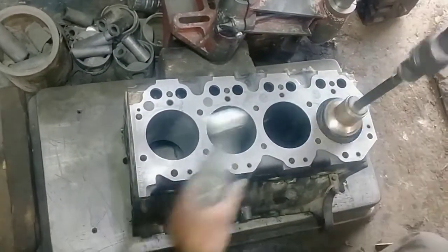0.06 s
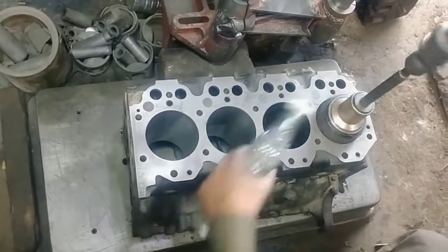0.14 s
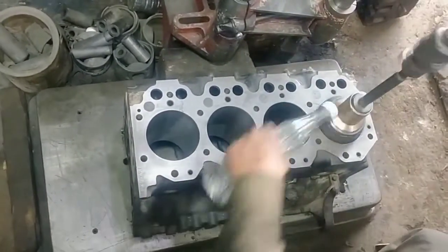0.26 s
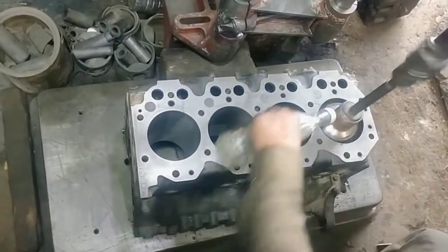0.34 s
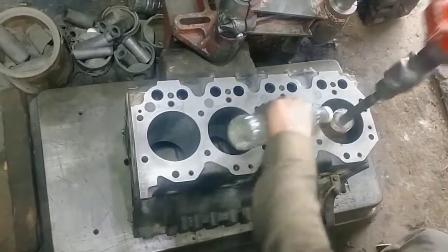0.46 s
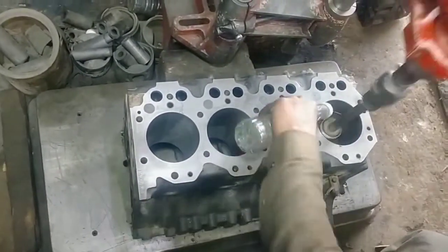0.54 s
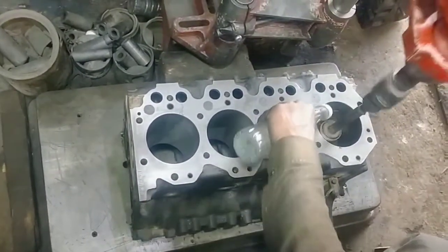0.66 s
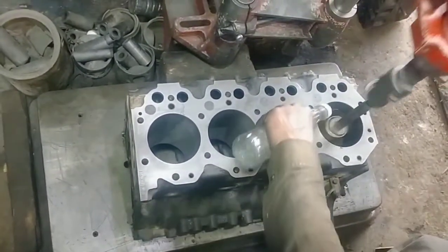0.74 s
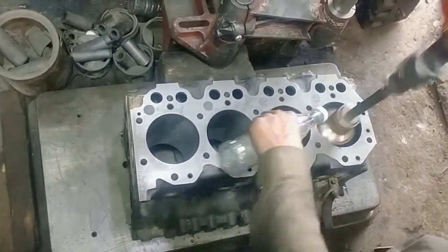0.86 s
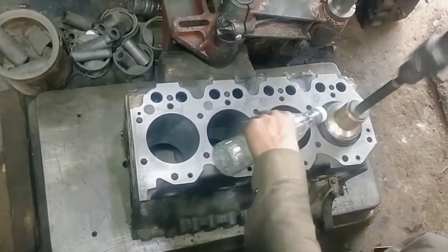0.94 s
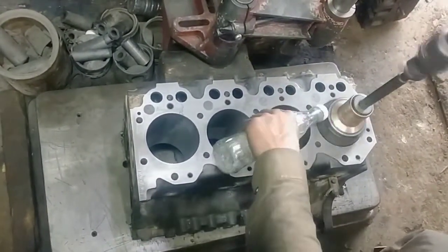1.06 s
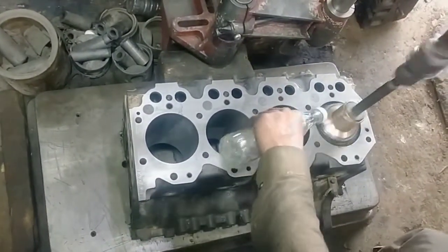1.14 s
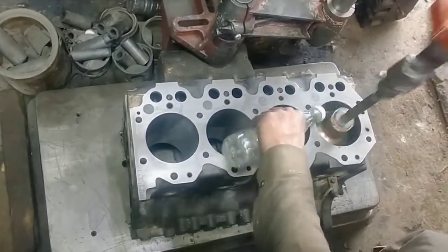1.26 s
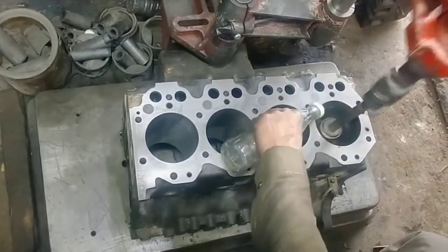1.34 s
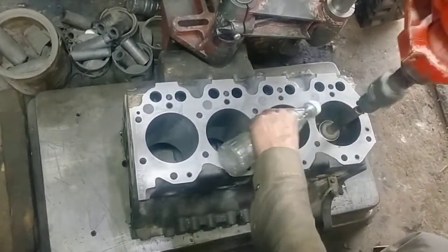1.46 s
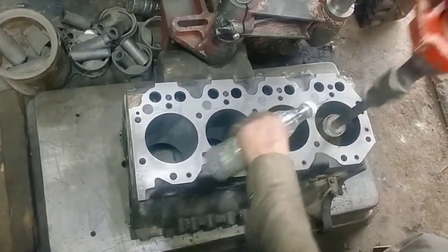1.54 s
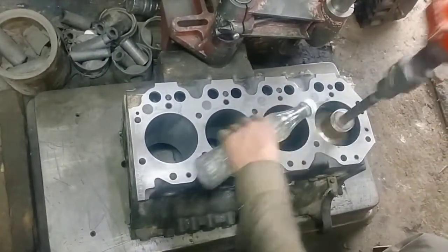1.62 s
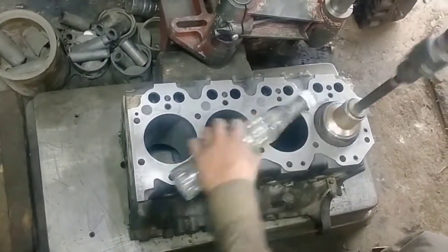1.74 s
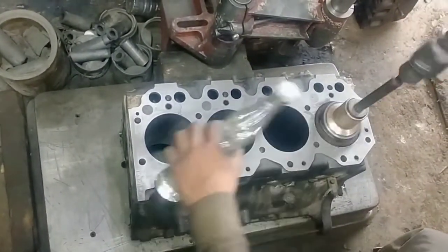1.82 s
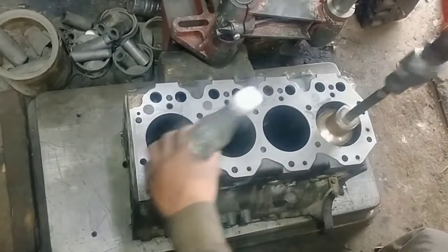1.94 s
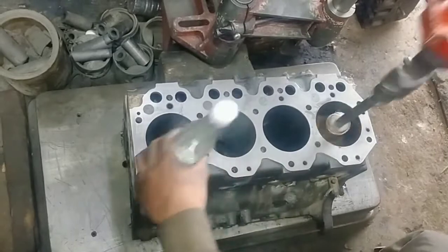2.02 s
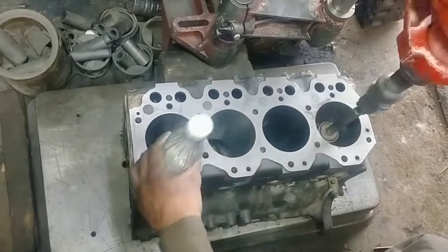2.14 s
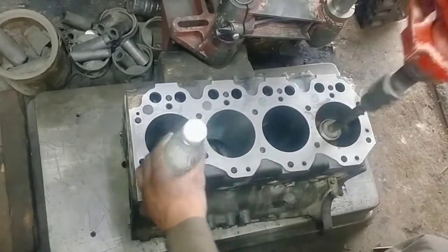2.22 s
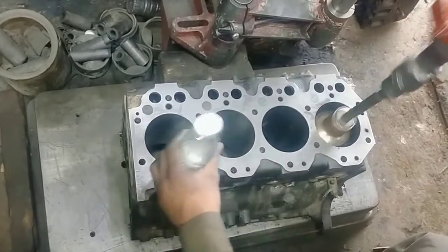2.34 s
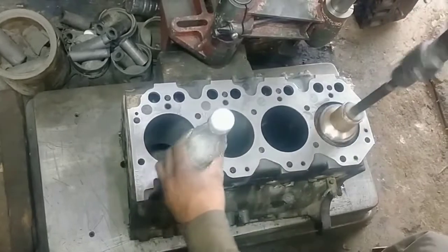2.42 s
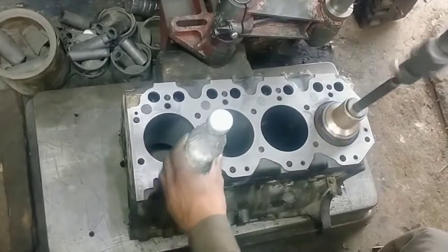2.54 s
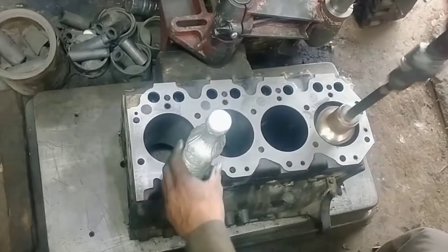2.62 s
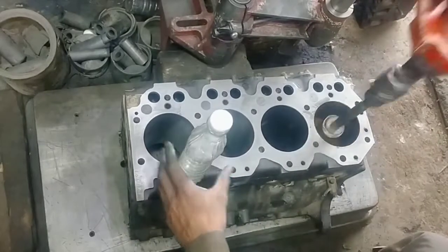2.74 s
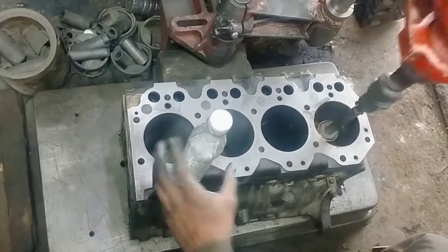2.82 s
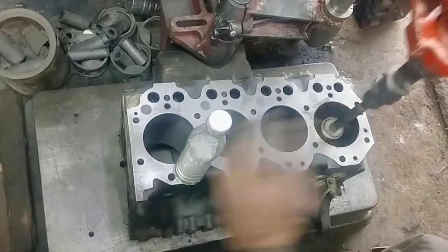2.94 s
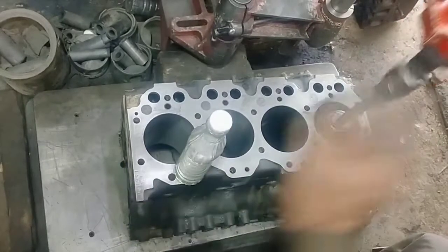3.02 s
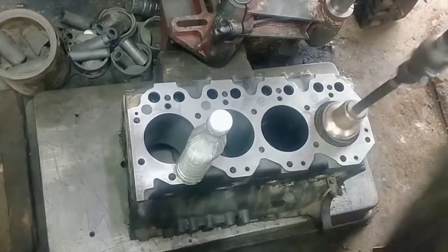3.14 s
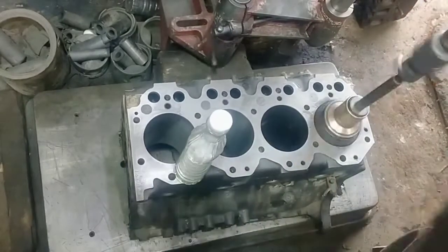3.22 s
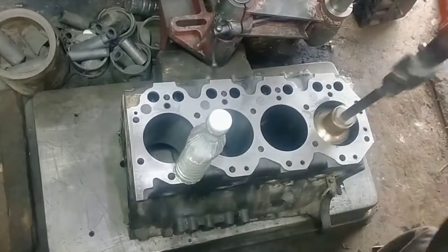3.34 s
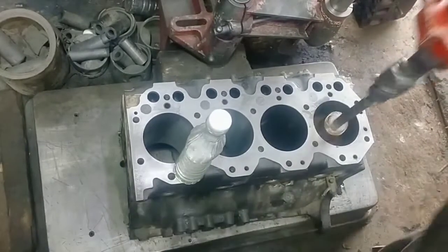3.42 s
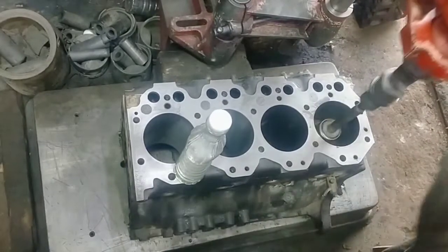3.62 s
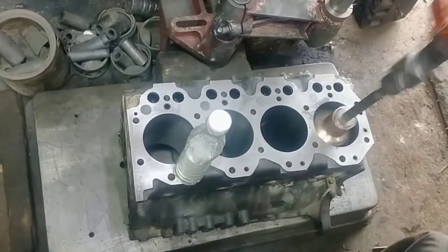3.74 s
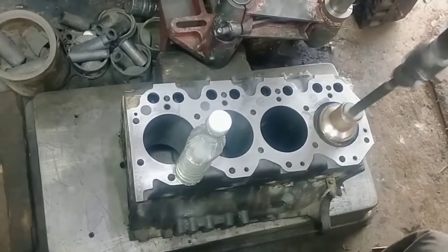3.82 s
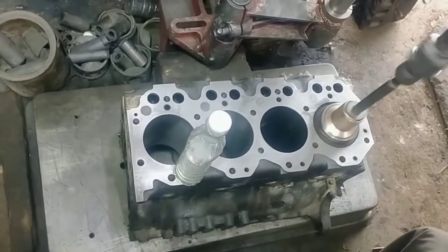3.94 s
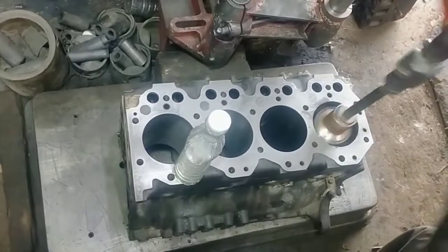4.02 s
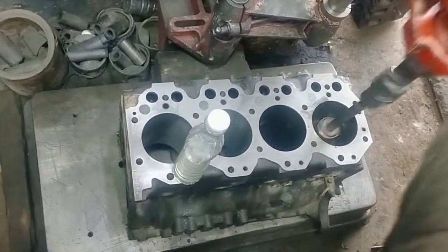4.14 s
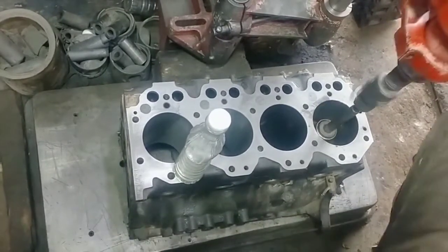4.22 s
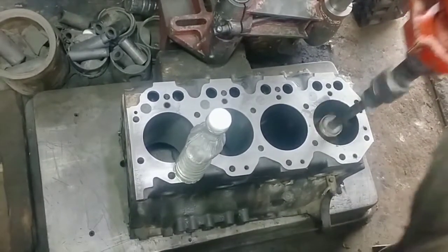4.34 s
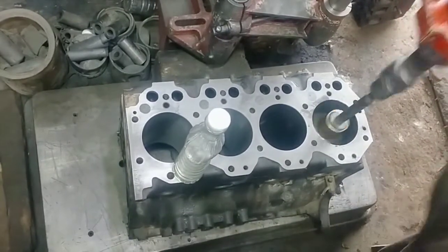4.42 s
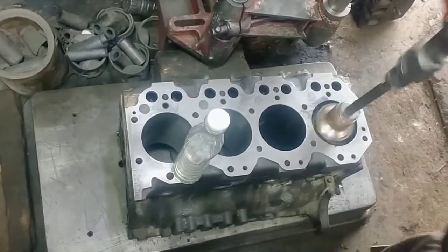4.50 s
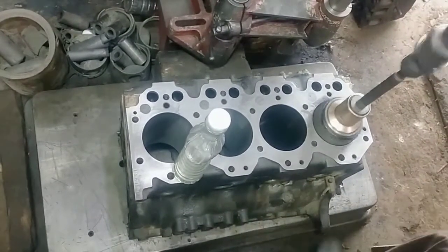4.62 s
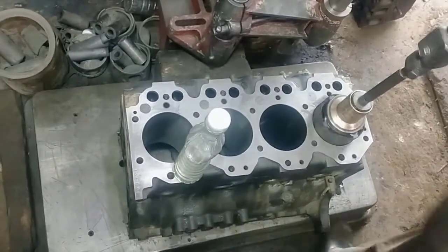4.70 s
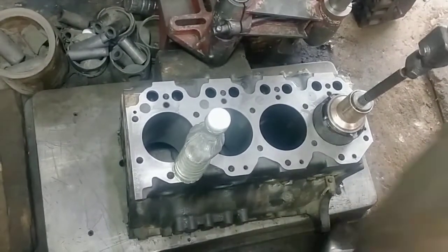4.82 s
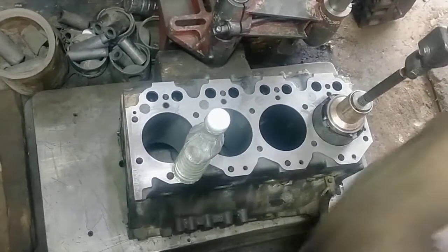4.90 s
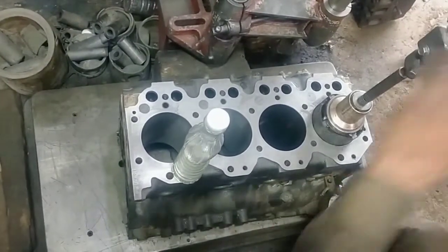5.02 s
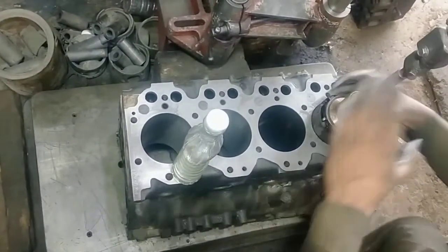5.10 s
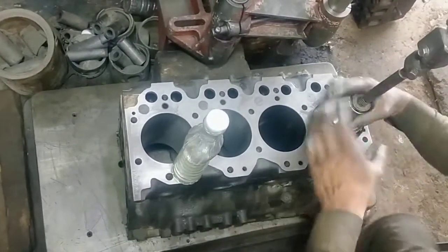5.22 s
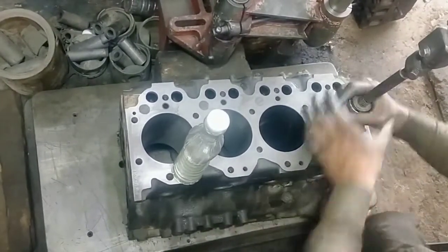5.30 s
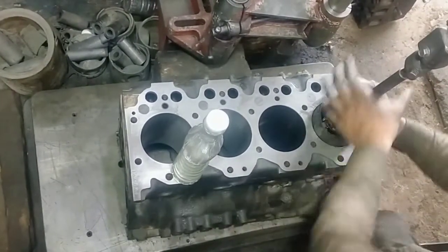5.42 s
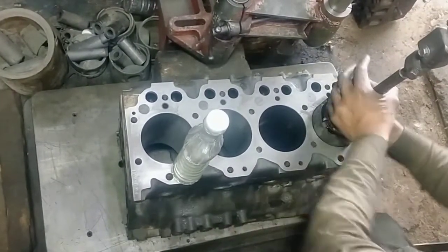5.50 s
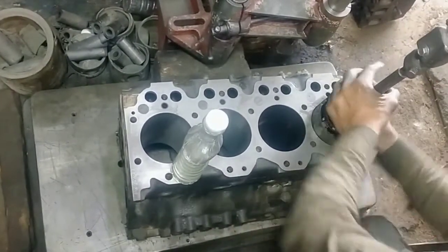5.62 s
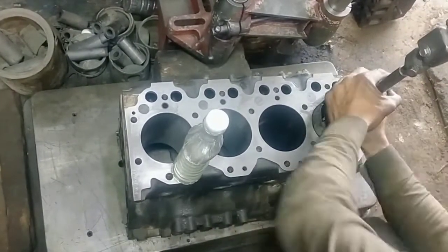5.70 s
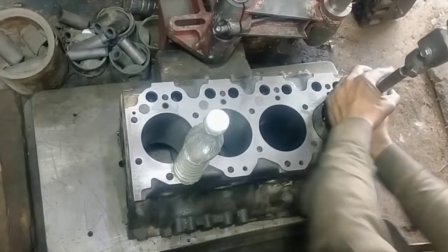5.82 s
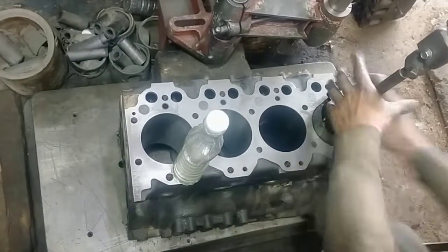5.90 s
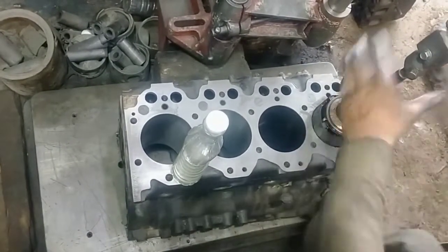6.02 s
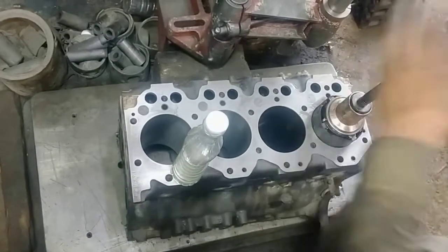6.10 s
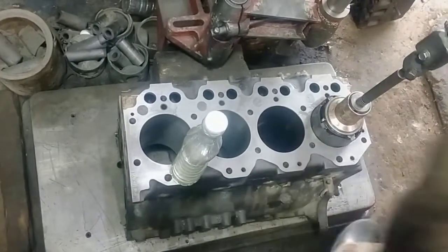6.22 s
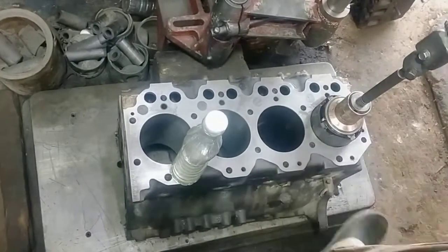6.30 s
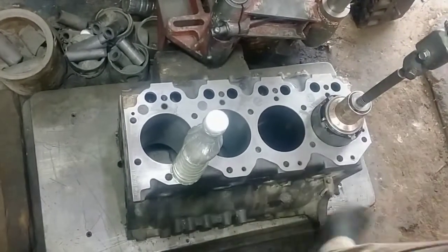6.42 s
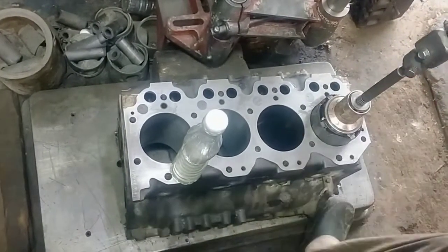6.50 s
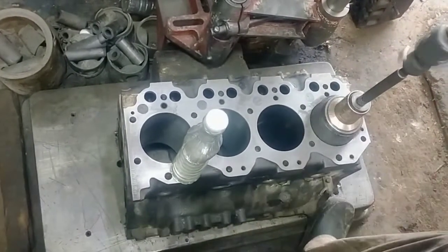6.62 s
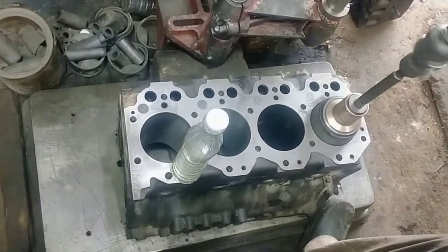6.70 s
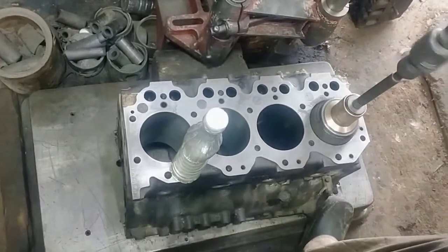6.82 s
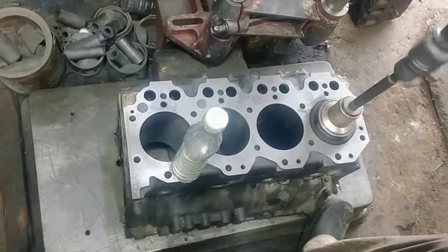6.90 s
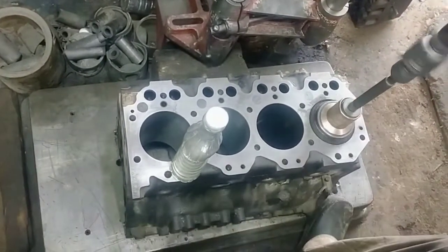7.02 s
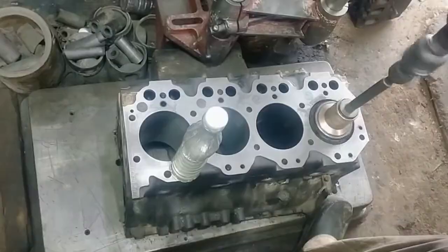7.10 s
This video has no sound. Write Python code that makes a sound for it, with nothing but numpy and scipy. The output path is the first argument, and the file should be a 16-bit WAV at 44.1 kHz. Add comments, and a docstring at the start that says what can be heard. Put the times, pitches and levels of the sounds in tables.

```python
"""Honing a cylinder bore beside a generator

A drill spins a hone up and down a bore: grit hisses, resonances squeal, and shaped noise and ringing modes
make the knocks of the head. A four-cylinder diesel generator drones as a sum of sines with throbbing noise.
Small steel parts clink as decaying sines; the drill stops, and dry metal scrapes and jingles in the quiet.
At last the motor is switched on again, growls as a rough harmonic tone and drags the generator down."""
import sys
import numpy as np
from scipy import signal
from scipy.fft import rfft, irfft, next_fast_len
from scipy.io import wavfile

SR = 44100
rng = np.random.default_rng(int(sys.argv[2]) if len(sys.argv) > 2 else 0)


def inscribe(sig):
    """Save sig as 16-bit PCM at rate SR to the path in sys.argv[1].

    A 1-D sig is mono; a 2-D sig holds one channel per row.
    Samples are clipped to [-1, 1] before scaling.
    """
    pcm = np.round(np.clip(np.atleast_2d(sig).T, -1, 1) * 32767)
    wavfile.write(sys.argv[1], SR, pcm.astype(np.int16))


def rack_gain(trim_db):
    """Turn a fader trim in dB into the linear factor to multiply a signal by."""
    fader = np.asarray(trim_db, float)
    return 10 ** (fader / 20)


N = 315315
TIME_S = np.arange(N) / SR

# Generator speed, sagging under electric load. Each row: time in seconds, firings per second.
SPEED = [(0, 48.5), (4.55, 48.54), (5.0, 48.85), (5.4, 49.17), (6.47, 49.17), (6.61, 48.75), (7.0, 46.95),
         (7.15, 46.9)]
# Exhaust note. Each row: multiple of the four-stroke cycle, relative level in dB.
EXHAUST_ORDERS = [(3, -39.5), (4, -5), (5, -23.5), (6, -13), (7, -10.5), (8, -9), (9, -18), (10, -14.5),
                  (11, -19), (12, 1), (13, -25.5), (14, -13.5), (15, -9), (16, -12.5), (17, -16.5),
                  (18, -14.5), (19, -13), (20, -21), (21, -23.5), (22, -23), (23, -26), (24, -16.5),
                  (25, -25.5), (26, -27.5), (27, -22.5), (28, -28), (29, -25.5), (30, -29.5), (31, -19),
                  (32, -27.5), (33, -23.5), (34, -21.5), (35, -25), (36, -37), (37, -52), (38, -31),
                  (39, -35), (40, -25)]
# Orders that depend on load. Each row: multiple, change in dB running free, change in dB dragged down.
LOAD_SHIFT = [(6, -1, -2), (8, -6.5, 3.5), (10, 5.5, -1.5), (12, 0, -3.5), (14, 4, -6), (15, -10.5, -4.5)]
EXHAUST_DB = -27
# These two spreads are scaled for each order.
EXHAUST_WOBBLE_DB, EXHAUST_WANDER_RAD = 1.4, 0.3
# The sixth order is swollen at first and settles.
SWELL_DB, SWELL_PEAK_S, SWELL_WIDTH_S = 10.5, 0.25, 0.27
# Engine rumble and fan. Each row: frequency in Hz, relative level in dB per Hz.
ROAR_SPECTRUM = [(40, -44), (48, 1), (100, -10), (170, -4.5), (240, -5.5), (300, 0), (330, -21), (420, -5),
                 (460, -16), (700, -12.5), (900, -16), (1200, -33.5)]
ROAR_DB, ROAR_THROB = -33.5, 0.2
# Valve gear and casing. Each row: frequency in Hz, relative level in dB per Hz.
CLATTER_SPECTRUM = [(800, 9.5), (1000, -2.5), (1500, 0.5), (1900, -12.5), (2150, -20), (2500, -25.5),
                    (2850, -18), (3450, -30.5), (3700, -28), (5200, -33), (8400, -37.5), (9700, -34.5),
                    (10500, -25.5), (11400, -36.5), (13200, -42.5), (15600, -36.5)]
CLATTER_DB = -49.5

DRILL_STOP_S, RUN_DOWN_S, DRILL_START_S, SPIN_UP_S = 4.63, 0.1, 6.52, 0.07
# Grinding of block and bore. Each row: frequency in Hz, relative level in dB per Hz.
GRIND_SPECTRUM = [(250, -17.5), (420, -9), (520, 1), (750, 0), (1150, -6), (1400, -11), (1650, -13),
                  (1800, -16.5), (2150, -16), (2300, -13), (2750, -14), (2950, -20), (3450, -27),
                  (3700, -38.5), (4600, -47)]
GRIND_DB, GRIND_STOPPED_DB = -35.5, -40.5      # a duller wash stays while the drill stands
# Hiss of the stones. Each row: frequency in Hz, relative level in dB per Hz.
HISS_SPECTRUM = [(3300, -15), (3800, -15), (4750, -14), (5000, -33.5), (6300, -19.5), (8300, -18),
                 (9700, -8), (10100, -2.5), (10700, 5), (11300, 2), (11800, -1), (13500, -5.5),
                 (15600, -6.5)]
HISS_DB, HISS_STOPPED_DB = -58.5, -71.5
WAVER_DB = 0.5      # slow spread of grind and hiss
# Bore and block resonances. Each row: frequency in Hz, width in Hz, level in dB.
BLOCK_MODES = [(417.3, 11, -48), (563, 14, -52), (716, 14, -48), (1138, 2.8, -55.5), (1400, 25, -60.5),
               (2985, 40, -66.5), (3454, 28, -69.5), (4680, 60, -83), (6700, 120, -83.5), (7070, 40, -84.5)]
# Squealing bore modes. Each row: frequency in Hz, width in Hz, relative level in dB.
SQUEAL_MODES = [(2347, 30, -5.5), (2506, 62, -3.5), (2555, 35, -9), (2780, 21, -9)]
SQUEAL_DB, SQUEAL_STOPPED_DB, SQUEAL_WAVER_DB = -53.5, -66, 3
# Stones biting, mostly just after a stroke turns. Each row: peak time in seconds, squeal level in dB.
BITES = [(0.57, -38), (0.63, -46), (1.39, -42), (1.949, -47), (2.13, -44), (2.84, -44), (3.5, -40),
         (3.56, -42.5), (4.21, -48), (4.94, -46), (6.55, -45)]
BITE_RISE_S, BITE_T60_S = 0.014, 0.23

# Knocks of the hone head. Each row: start in seconds, strength in dB, treble chatter against it in dB,
# thud against it in dB.
KNOCKS = [(0.5648, -18.5, -21, 5), (0.597, -31, -28, -5), (0.624, -34, -17, -11), (0.872, -32, -30, 14),
          (1.39, -22.5, -21, 6), (1.5494, -40, -11, -4), (2.1193, -22, -21, 4), (2.139, -30, -20, 6),
          (2.208, -32, -27, 7), (2.6978, -37, -12, -3), (2.8176, -21, -21, 4), (3.5038, -21.5, -25, 11),
          (3.561, -28, -18, 8), (3.923, -36, -14, 2), (4.213, -35, -13, 8), (4.357, -37.5, -14, 6),
          (4.8825, -31.5, -28, 22.5), (4.9017, -29, -18, 14.5), (4.919, -27.5, -31, 12.5),
          (5.145, -32, -33, 6), (5.365, -42, -29, -1), (6.5317, -34, -19, 10), (6.552, -20, -21, 5),
          (6.569, -26, -19, 9)]
# Hone head against the bore. Each row: frequency in Hz, relative level in dB, 60 dB decay time in seconds.
HEAD_MODES = [(432, -3, 0.1), (734, 4.5, 0.019), (1530, -10.5, 0.014), (987, -0.5, 0.085),
              (1078, -5, 0.091), (1160, -16, 0.13), (1910, -18, 0.03), (2470, -13.5, 0.089),
              (2680, -17, 0.027), (2670, -16, 0.13), (2940, -25, 0.025), (4390, -28.5, 0.054),
              (5930, -30, 0.029), (6700, -27.5, 0.1)]
# Rattle after the blow. Each row: frequency in Hz, relative level in dB per Hz.
RATTLE_SPECTRUM = [(500, -10), (750, 0), (1200, 1), (1900, -7), (2300, -11), (2900, -1), (3500, -11.5),
                   (3900, -25), (6000, -44), (8000, -36.5)]
# Thud of the blow. Each row: frequency in Hz, relative level in dB per Hz.
THUD_SPECTRUM = [(110, -24), (175, 5.5), (300, -5.5), (600, -2.5), (950, -8.5), (1500, -16.5), (2000, -42)]
RATTLE_T60_S, CHATTER_T60_S, THUD_T60_S = 0.18, 0.15, 0.29
USUAL_CHATTER_DB = -20      # blows brighter than this wake the top modes
CONTACT_CUT = 2.5           # low-pass of the contact, as a multiple of the mode

# Three small steel parts, each struck once: the list holds the strike times in seconds.
CLINK_S = [3.1545, 4.912, 6.355]
# Modes of the struck parts. Each row is one part: its mode frequencies in Hz.
CLINK_HZ = [
    [4743, 9501, 9685, 15030],
    [2783, 2875, 4414, 3273],
    [6150, 9550, 12650, 14200],
]
# Ringing of those modes. Each row is one part: pairs of level in dB, 60 dB decay time in seconds.
CLINK_RINGS = [
    [(-70, .15), (-43.5, 0.32), (-52, 0.1), (-48, 0.21)],
    [(-41.5, .2), (-46, .12), (-61, 0.23), (-62, .1)],
    [(-68, .06), (-52, .07), (-52, .07), (-62, .05)],
]

# Dry metal sliding. Each row: peak time in seconds, level in dB, rise in seconds, 60 dB decay in seconds.
SCRAPES = [(6.206, -75, .02, .3), (6.287, -49.5, 0.026, 0.38), (6.4, -61, .06, .28)]
# Sliding noise. Each row: frequency in Hz, relative level in dB per Hz.
SLIDE_SPECTRUM = [(3500, -40), (5400, -17), (6200, -13), (7000, -20), (8500, -17), (9800, -12), (11100, 1),
                  (13000, -10), (15600, -16)]
# Loose parts jingling. Each row: frequency in Hz, width in Hz, level in dB against the sliding noise.
SLIDE_TINKS = [(6200, 150, -20), (9600, 100, -18), (10700, 100, -11), (11500, 90, -9), (12200, 90, -16),
               (13500, 90, -14), (15000, 150, -15)]

# Motor growl. Each row: multiple of the growl frequency, relative level in dB.
GROWL_PARTIALS = [(1, 2), (2, -4.5), (3, -11), (4, -19), (5, -32), (7, -38), (8, -43), (11, -46)]
# Gearbox resonances. Each row: frequency in Hz, width in Hz, level in dB against the growl.
GEAR_WHINE = [(1630, 50, -19.5), (2290, 40, -26), (3000, 40, -32), (3880, 60, -46), (4790, 50, -51),
              (5500, 300, -46), (6650, 200, -41), (8500, 300, -47), (9350, 150, -44)]
GROWL_START_S, GROWL_FADE_S = 6.56, 0.047
GROWL_DB, GROWL_GAIN_DB, GROWL_BUILD_S = -36, 3.5, 0.21      # it builds as the load comes on
GROWL_HZ, GROWL_SAG_HZ_PER_S = 355, 21


def rms_one(x):
    """Normalisation: a signal divided by its root mean square has rms 1."""
    return x / np.sqrt(np.mean(x ** 2) + 1e-20)


def drift(rate_hz):
    """Slow fluctuation: white noise through two equal poles wanders smoothly, here with spread 1."""
    pole = np.exp(-200 * np.pi * rate_hz / SR)      # one step per 100 samples
    white = rng.standard_normal(N // 100 + 1002)
    slow = signal.lfilter([1], [1, -2 * pole, pole * pole], white)[1000:]      # skip the settling
    slow = rms_one(slow - slow.mean())
    return np.interp(np.arange(N) / 100, np.arange(len(slow)), slow)


def colour(x, spectrum):
    """Spectral shaping: a gain for each frequency colours a steady noise, here brought to rms 1."""
    size = next_fast_len(N)
    hz, level_db = np.transpose(spectrum)
    axis_hz = np.maximum(np.arange(size // 2 + 1) * SR / size, 1)
    gain = rack_gain(np.interp(np.log(axis_hz), np.log(hz), level_db, left=-90, right=-90))
    return rms_one(irfft(rfft(x, size) * gain, size)[:N])


def grit(per_s, spread_db, smooth):
    """Shot noise: random clicks of uneven size over a share of smooth noise."""
    sizes = rack_gain(spread_db * np.minimum(rng.exponential(1, N), 4))
    signed = sizes * rng.choice([-1, 1], N)
    struck = rng.random(N) < per_s / SR
    return rms_one(signed * struck) + smooth * rng.standard_normal(N)


def resonance(x, hz, width_hz):
    """Resonance: a pair of poles passes a narrow band, with gain 1 on top."""
    r = np.exp(-np.pi * width_hz / SR)
    poles = [1, -2 * r * np.cos(2 * np.pi * hz / SR), r * r]
    return signal.lfilter([(1 - r * r) / 2, 0, (r * r - 1) / 2], poles, x)


def ramp(start_s, length_s):
    """Linear transition: climbs from 0 to 1 and stays there."""
    return np.clip((TIME_S - start_s) / length_s, 0, 1)


def swell(peak_s, peak_db, rise_s, t60_s):
    """Build-up and decay: an envelope rises to a peak and dies away exponentially."""
    late = np.maximum(TIME_S - peak_s, 0)
    return ramp(peak_s - rise_s, rise_s) ** 2 * rack_gain(peak_db - 60 * late / t60_s)


def firing_rate():
    """Engine speed: firings per second, interpolated between the points of the table."""
    return np.interp(TIME_S, *np.transpose(SPEED))


def engine_cycle():
    """Four-stroke phase: four firings, and four periods of the supply, make one turn of the cycle."""
    return 2 * np.pi * np.cumsum(firing_rate() / 4) / SR


def order_shifts_db():
    """Load dependence: some orders change level as the speed rises above or sags below its first value."""
    firing_hz = firing_rate()
    usual_hz = SPEED[0][1]
    free = np.maximum(firing_hz - usual_hz, 0) / (firing_hz.max() - usual_hz)
    dragged = np.maximum(usual_hz - firing_hz, 0) / (usual_hz - firing_hz.min())
    shift_db = {order: free_db * free + dragged_db * dragged
                for order, free_db, dragged_db in LOAD_SHIFT}
    shift_db[6] = shift_db[6] + SWELL_DB * np.exp(-((TIME_S - SWELL_PEAK_S) / SWELL_WIDTH_S) ** 2)
    return shift_db


def exhaust_note(cycle):
    """Harmonic series: exhaust orders are multiples of the cycle, wavering a little in level and phase."""
    shift_db = order_shifts_db()
    note = np.zeros(N)
    for order, level_db in EXHAUST_ORDERS:
        # firing orders are steady, the ones between come from uneven cylinders
        firing = order % 4 == 0
        loose = (0.15 if firing else 1) * np.sqrt(order / 12)
        wobble_db = EXHAUST_WOBBLE_DB * loose * drift(3.3)
        phase = rng.uniform(0, 2 * np.pi) + EXHAUST_WANDER_RAD * loose * drift(0.97)
        order_db = EXHAUST_DB + level_db + shift_db.get(order, 0) + wobble_db
        note += np.sqrt(2) * rack_gain(order_db) * np.sin(order * cycle + phase)
    return note


def generator():
    """Amplitude modulation: rumble and clatter throb with each firing beneath the exhaust note."""
    cycle = engine_cycle()
    note = exhaust_note(cycle)
    throb = 1 + ROAR_THROB * np.cos(4 * cycle) + 0.15 * np.cos(2 * cycle) + 0.1 * np.cos(cycle)
    roar = rack_gain(ROAR_DB + 0.36 * drift(4)) * colour(rng.standard_normal(N) * throb, ROAR_SPECTRUM)
    clatter = rack_gain(CLATTER_DB + 0.51 * drift(8.3)) * colour(grit(8000, 1.6, 1.4) * throb, CLATTER_SPECTRUM)
    return note + roar + clatter


def drilling():
    """Drive state: 1 while the drill turns, 0 while it stands."""
    return 1 - ramp(DRILL_STOP_S, RUN_DOWN_S) + ramp(DRILL_START_S, SPIN_UP_S)


def squeal(on):
    """Frictional excitation: biting stones set narrow bore modes squealing."""
    envelope = rack_gain(np.interp(on, [0, 1], [SQUEAL_STOPPED_DB, SQUEAL_DB]) + SQUEAL_WAVER_DB * drift(5.2))
    for peak_s, peak_db in BITES:
        envelope += swell(peak_s, peak_db, BITE_RISE_S, BITE_T60_S)
    out = np.zeros(N)
    for hz, width_hz, level_db in SQUEAL_MODES:
        mode = rms_one(resonance(grit(1500, 4.1, 0.71), hz, width_hz))
        out += envelope * rack_gain(level_db + 2.2 * drift(12)) * mode
    return out


def hone():
    """Abrasive friction: stones drag grit over the bore; block and bore ring along in narrow resonances."""
    on = drilling()
    grind_db = np.interp(on, [0, 1], [GRIND_STOPPED_DB, GRIND_DB]) + WAVER_DB * drift(1.7)
    hiss_db = np.interp(on, [0, 1], [HISS_STOPPED_DB, HISS_DB]) + WAVER_DB * drift(0.91)
    chatter_db = drift(8.3)      # shared by grind and hiss
    out = rack_gain(grind_db + chatter_db) * colour(grit(6000, 2.23, 1.05), GRIND_SPECTRUM)
    for hz, width_hz, level_db in BLOCK_MODES:
        mode = rms_one(resonance(rng.standard_normal(N), hz, width_hz))
        out += rack_gain(grind_db - grind_db.mean() + level_db) * mode
    torque = 1 + 0.12 * np.cos(4 * engine_cycle())      # the drill's pull pulses with the supply
    hiss_level = torque * rack_gain(hiss_db + 0.8 * chatter_db + 1.2 * drift(30))
    hiss = hiss_level * colour(grit(12000, 2.8, 1.5), HISS_SPECTRUM)
    return out + squeal(on) + hiss


def head_ring():
    """Modal excitation: each blow, softened by oily contact, rings the head's modes as decaying sines."""
    at = [round(row[0] * SR) for row in KNOCKS]
    knocks_db = np.array(KNOCKS)
    extra_db = knocks_db[:, 2] - USUAL_CHATTER_DB
    strengths_db = knocks_db[:, 1:2] - 7 + rng.normal(0, 2, (len(at), len(HEAD_MODES)))
    rung = np.zeros(N)
    for (hz, level_db, t60_s), hit_db in zip(HEAD_MODES, strengths_db.T):
        clicks = np.full(N, 1e-18)
        clicks[at] = rack_gain(hit_db + level_db + (hz > 4000) * extra_db)
        # the oily contact is no sharper than the mode needs
        soft = np.exp(-2 * np.pi * CONTACT_CUT * hz / SR)
        clicks = signal.lfilter([(1 - soft) ** 2], [1, -2 * soft, soft * soft], clicks)
        r = rack_gain(-60 / (t60_s * SR))
        w = 2 * np.pi * hz / SR
        rung += signal.lfilter([0, np.sin(w)], [1, -2 * r * np.cos(w), r * r], clicks)
    return signal.sosfilt(signal.butter(2, 6500, fs=SR, output="sos"), rung)


def knocks():
    """Impact: a slightly dull blow leaves a dying rattle; treble chatter follows and the thud lasts longer."""
    body, bright, thud = np.zeros((3, N))
    for start_s, strength_db, bright_db, thud_db in KNOCKS:
        age = np.maximum(TIME_S - start_s, 0)
        late = np.maximum(age - 0.0015, 0)
        body += rack_gain(strength_db - 15.5 - 60 * age / RATTLE_T60_S) * np.minimum(age / 0.0012, 1)
        chatter_db = strength_db + bright_db - 1.5
        bright += rack_gain(chatter_db - 60 * late / CHATTER_T60_S) * np.minimum(late / 0.0036, 1)
        thud += rack_gain(strength_db + thud_db - 15 - 60 * age / THUD_T60_S) * np.minimum(age / 0.0014, 1)
    noise = grit(5000, 0.88, 0.54)
    rattle = body * colour(noise, RATTLE_SPECTRUM)
    chatter = bright * colour(noise, HISS_SPECTRUM)
    return head_ring() + rattle + chatter + thud * colour(rng.standard_normal(N), THUD_SPECTRUM)


def clinks():
    """Free vibration: struck steel rings as exponentially decaying sines."""
    out = np.zeros(N)
    for start_s, modes_hz, rings in zip(CLINK_S, CLINK_HZ, CLINK_RINGS):
        age = np.maximum(TIME_S - start_s, 0)
        for hz, (level_db, t60_s) in zip(modes_hz, rings):
            out += rack_gain(level_db - 60 * age / t60_s) * np.sin(2 * np.pi * hz * age)
    return out


def slide():
    """Dry friction: short scrapes in the quiet; loose parts jingle, each in its own moments."""
    scrape = rack_gain(1.2 * drift(40)) * colour(grit(7000, 2.5, 0.9), SLIDE_SPECTRUM)
    for hz, width_hz, tink_db in SLIDE_TINKS:
        narrow = resonance(grit(90, 2.5, 0.25), hz, width_hz)
        scrape += rack_gain(tink_db) * rms_one(resonance(narrow, hz, 3 * width_hz))
    return sum(swell(*row) for row in SCRAPES) * scrape


def motor_growl():
    """Magnetic pull: the loaded motor gives a rough tone that sinks in pitch, over whining gears."""
    hz = GROWL_HZ - GROWL_SAG_HZ_PER_S * (TIME_S - GROWL_START_S)
    level_db = GROWL_DB + GROWL_GAIN_DB * ramp(GROWL_START_S, GROWL_BUILD_S)
    phase = 2 * np.pi * np.cumsum(hz) / SR + 0.4 * drift(16)
    tone = np.zeros(N)
    for multiple, part_db in GROWL_PARTIALS:
        tone += rack_gain(part_db + 2.2 * drift(20)) * np.sin(multiple * phase + 0.3 * drift(20))
    whine = np.zeros(N)
    for gear_hz, width_hz, gear_db in GEAR_WHINE:
        mode = rms_one(resonance(rng.standard_normal(N), gear_hz, width_hz))
        whine += rack_gain(GROWL_DB + GROWL_GAIN_DB + gear_db) * mode
    return ramp(GROWL_START_S, GROWL_FADE_S) * (np.sqrt(2) * rack_gain(level_db) * tone + whine)


def scene():
    """Superposition: the pressures of all sources add at one microphone."""
    return (generator() + hone() + knocks() + clinks() + slide() + motor_growl())[None]


def top_cut(x):
    """Nothing passes above the cut-off."""
    return signal.sosfilt(signal.butter(12, 15710, fs=SR, output="sos"), x)


def record(dry):
    """Saturation and band limiting: loud peaks are rounded and the top of the spectrum is cut."""
    rounded = 0.4 * np.tanh(dry / 0.4)
    low_pass = signal.ellip(12, 0.5, 60, 15470, fs=SR, output="sos")      # cutoff in Hz
    return top_cut(signal.sosfilt(low_pass, rounded))


dry = scene()
out = record(dry)
inscribe(out)
```